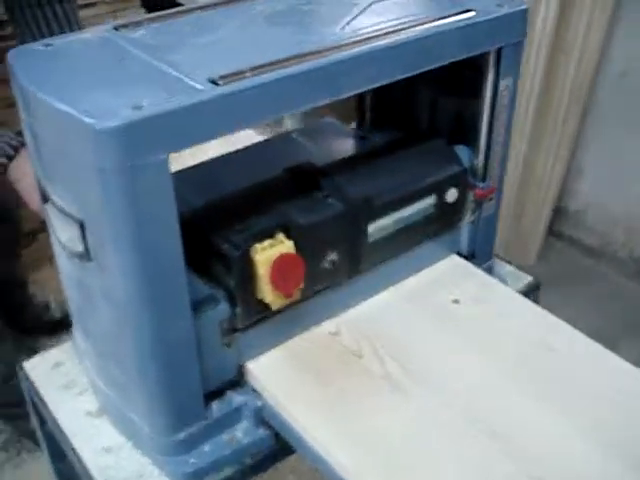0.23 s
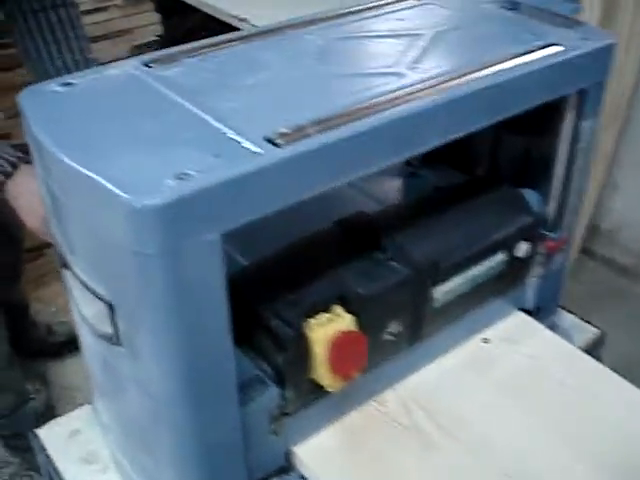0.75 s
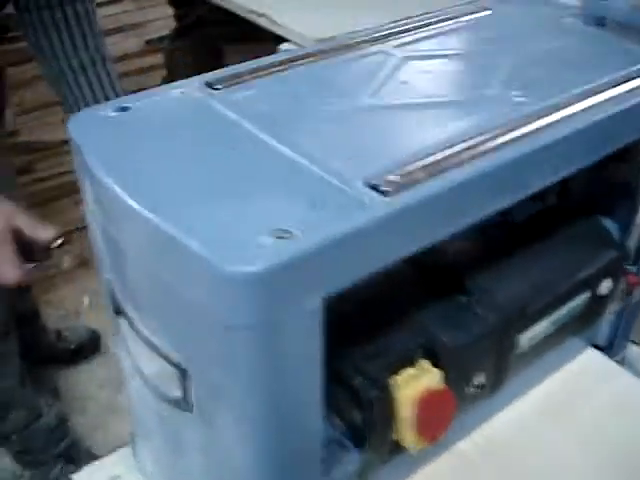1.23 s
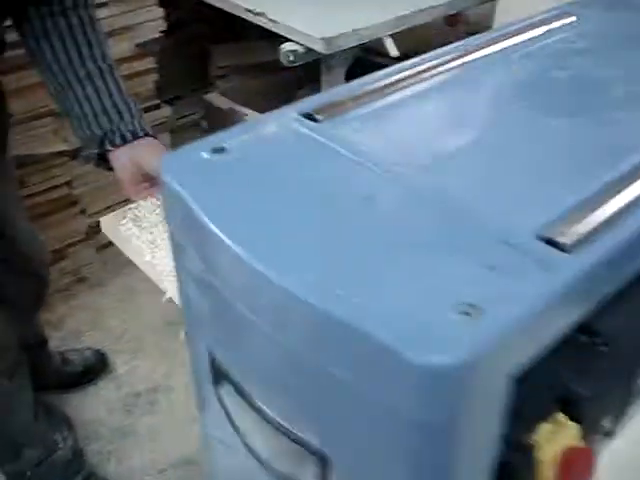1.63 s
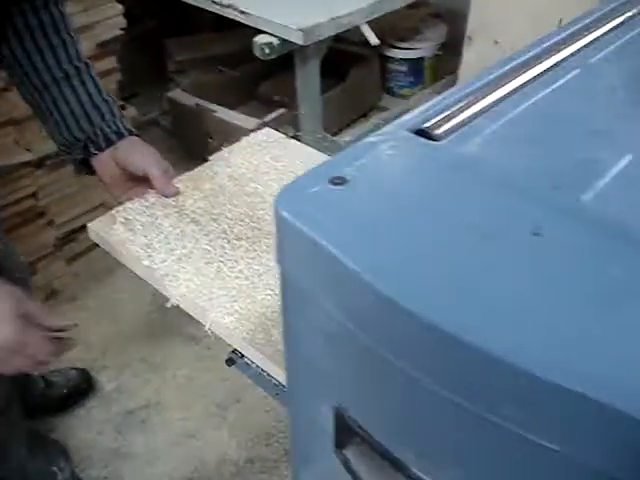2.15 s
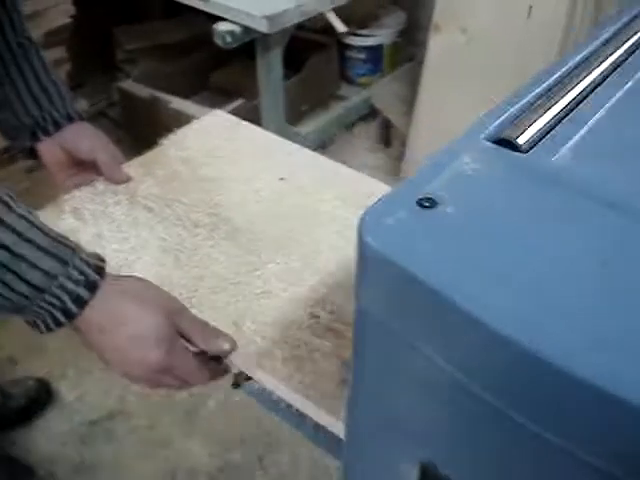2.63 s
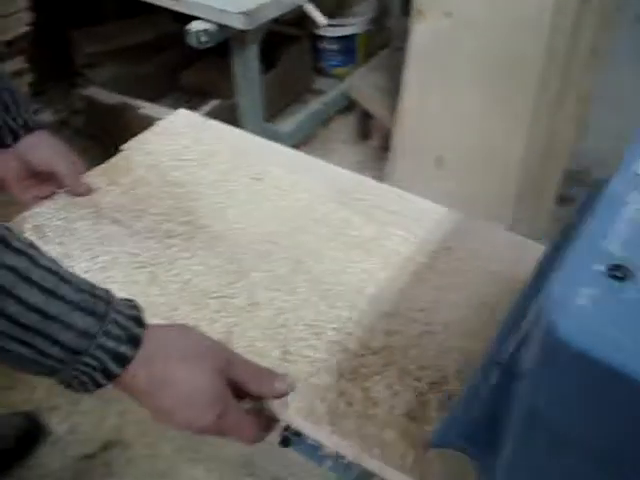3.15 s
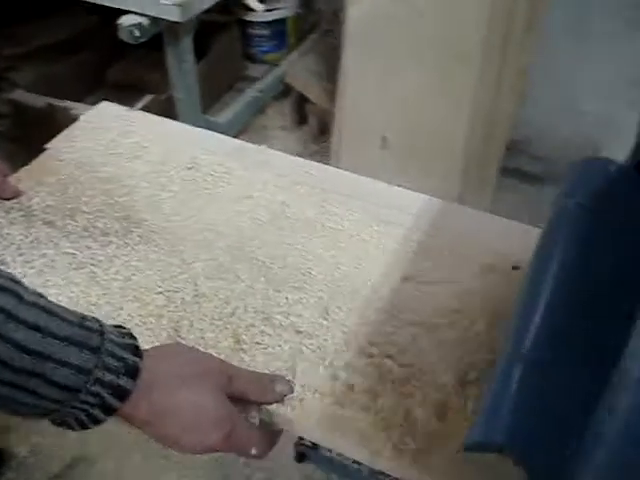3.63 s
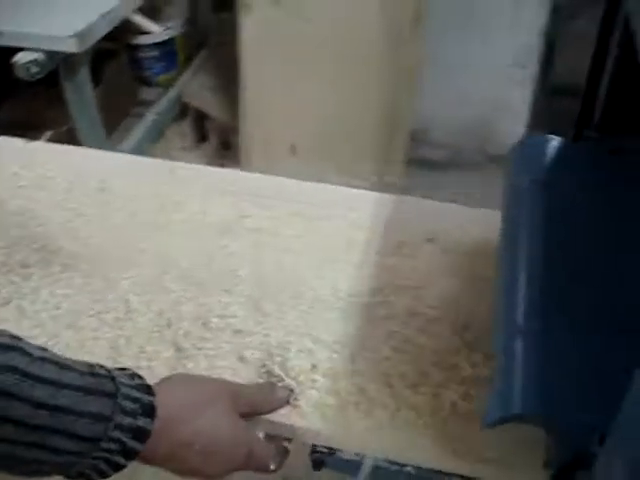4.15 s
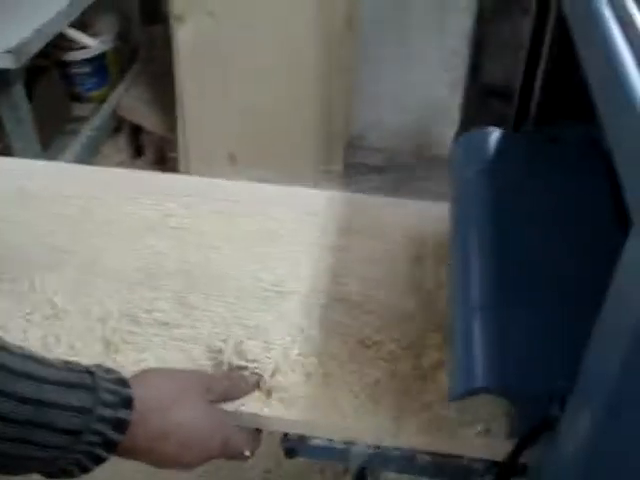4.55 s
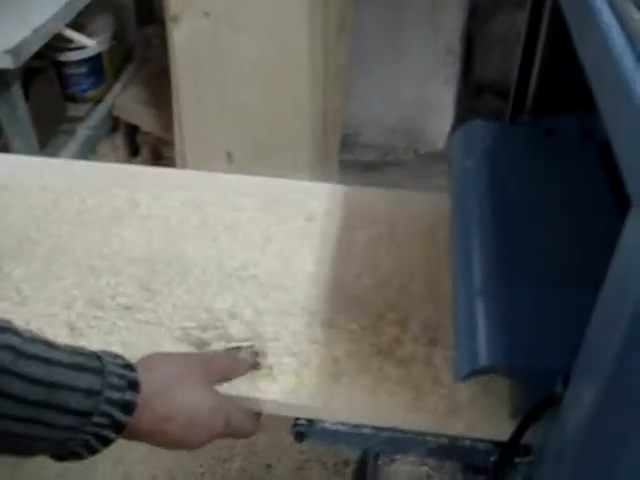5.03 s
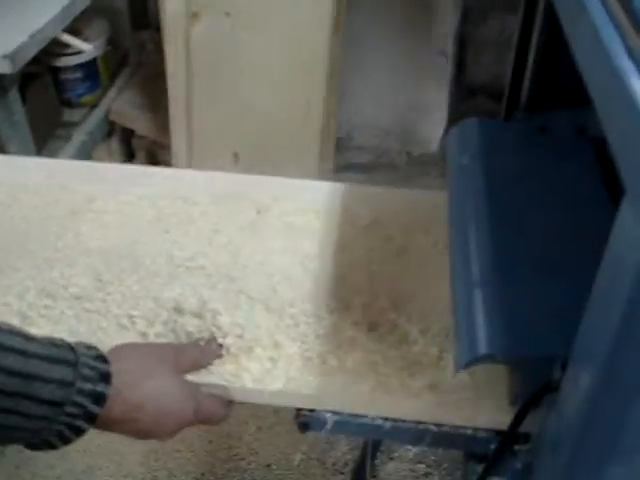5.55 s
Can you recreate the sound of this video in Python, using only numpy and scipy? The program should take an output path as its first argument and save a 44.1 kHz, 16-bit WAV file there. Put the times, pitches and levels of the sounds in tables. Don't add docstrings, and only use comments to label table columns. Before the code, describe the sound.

In a workshop, a powered planer drones without pause, a dense electric buzz wrapped in coarse hiss and tiny chip ticks. The pitch climbs over the first half, slides down under load, and lifts again in the last second. A moving cheap camera microphone gives hollow, swirling echo changes, mild overload, thin bass, gritty treble and a few dull knocks.

```python
import sys
import numpy as np
from scipy import signal
from scipy.io import wavfile
from scipy.ndimage import uniform_filter1d, minimum_filter1d

SR = 44100
rng = np.random.default_rng(int(sys.argv[2]) if len(sys.argv) > 2 else 0)


def volts_from_db(level):
    exponent = np.asarray(level, float) / 20
    return 10 ** exponent


def transcribe(signal):
    frames = np.atleast_2d(signal).T
    limited = np.clip(frames, -1, 1)
    pcm = np.round(limited * 32767).astype(np.int16)
    wavfile.write(sys.argv[1], SR, pcm)


N = 255780
HOP = 256


def knife(turn, count=76):
    # (order, level [dB])
    behind = [(1, -39.5), (2, -23.5), (3, -19.5), (4, -15), (5, -1), (6, 0.5), (7, -2), (8, -1), (9, -4.5),
              (10, -8.5), (11, -6), (12, -1.5), (13, -8), (14, -2), (15, -11), (16, -4.5), (17, -16.5),
              (18, -0.5), (19, -1), (20, -4.5), (21, 3), (22, -4), (23, -2.5), (24, 0.5), (25, -4.5),
              (26, -2.5), (27, -12.5), (28, -5), (29, -3), (30, -14)]
    beside = [(1, -29), (2, -26.5), (3, -5), (4, -10), (5, -7.5), (6, -1), (7, -3.5), (8, 5), (9, -1),
              (10, 1), (11, 0.5), (12, 0.5), (13, 1), (14, -0.5), (15, -4), (16, -7), (17, 1), (18, -3),
              (19, 0), (20, -6), (21, -3), (22, -4.5), (23, -11), (24, -1), (25, -12), (26, -2), (27, -6),
              (28, -6), (29, -5), (30, -9.5)]
    front = [(1, -37.5), (2, -30.5), (3, -26.5), (4, -12), (5, -18), (6, -7), (7, 2), (8, -7), (9, -6),
             (10, -5.5), (11, -7), (12, -4.5), (13, -2.5), (14, -8.5), (15, -7), (16, -8.5), (17, -11),
             (18, -5), (19, -5), (20, -7.5), (21, -1), (22, -4.5), (23, -9.5), (24, -7), (25, -3.5),
             (26, -6), (27, -18), (28, -2), (29, -4.5), (30, -15.5)]
    place_times = [0.78, 2.35, 4.37]
    # (frequency [Hz], level [dB])
    tone_share = [(300, -2.7), (1500, -5), (3100, -5), (5000, -4), (7000, -2.5), (9000, -0.5)]
    first_high_db, fall_db = -8, 0.62
    lasting_scatter, drifting_slip = 0.75, 1.5
    most_echo, quick_share = 0.4, 0.09

    t = np.arange(N // HOP + 2) * HOP / SR
    order = np.arange(1, count + 1)
    low = np.array([behind, beside, front])[:, :, 1].T
    low_db = np.array([np.interp(t, place_times, row) for row in low])
    high_db = first_high_db - fall_db * np.arange(count - len(low))
    db = np.vstack([low_db, high_db[:, None] + 0 * t])
    hz = order[:, None] * speed(t)
    db = db + interference_db(t, hz) + view_db(t, hz)
    total_db = 10 * np.log10(volts_from_db(2 * db).sum(0))
    db = db + walk(t, column=1) - total_db + read(tone_share, hz)

    slow = drift(db.shape, 1, 14.9) + 1j * drift(db.shape, 1, 16)
    quick = drift(db.shape, 3, 3) + 1j * drift(db.shape, 3, 3)
    echo_share = np.clip(0.32 + 0.024 * order, 0, most_echo)[:, None]
    path = np.sqrt(1 - echo_share ** 2) + echo_share * slow / np.sqrt(2) + quick_share * quick
    delay = np.cumsum(lasting_scatter * drift((count, 1), 2, 1), 0)
    delay = delay + drifting_slip * drift(db.shape, 5, 70)
    gain = -np.sqrt(2) * volts_from_db(db) * path * np.exp(1j * delay * walk(t, column=3))

    one_turn = np.exp(2j * np.pi * turn)
    wave, out, at = 1, np.zeros(N), np.arange(N) / SR
    for row in gain:
        wave = wave * one_turn
        out += np.interp(at, t, row.real) * wave.real - np.interp(at, t, row.imag) * wave.imag
    return out


def turns():
    tremor = evened(uniform_filter1d(rng.standard_normal(N), size=400))
    return np.cumsum(speed(np.arange(N) / SR)) / SR + 0.00068 * tremor


def speed(t):
    # (time [s], turning rate [Hz])
    turning_rate = [(0,126.1),(.2,126.1),(.45,124.9),(.7,123.2),(1.1,126.9),(1.42,130.1),(1.7,129.7),(2,130.5),(2.4,133.9),(2.6,134.7),(2.95,132.9),(3.2,128.9),(3.5,121.6),(4.4,115.8),(4.92,111),(5.2,113.9),(5.42,115.6),(5.8,125.1)]
    return np.interp(t, *np.transpose(turning_rate))


def bite(turn, treble, spread_db):
    depth_db = spread_db * rng.standard_normal(1000)[turn.astype(int)]
    change = volts_from_db(uniform_filter1d(depth_db, size=40)) - 1
    return treble_of(treble * change, hz=1370)


def fibres(turn):
    # (frequency [Hz], level [dB per Hz])
    hiss_spectrum = [(18, -56), (30, -14), (181, -35.5), (230, -17), (287, -16), (477, -6.5), (703, -5.5),
                     (775, 0), (1200, -2.5), (2200, 0), (5400, -6), (9900, -16), (12900, -63),
                     (21800, -120)]
    frames = N // HOP + 5
    hz = np.fft.rfftfreq(1024, 1 / SR)
    t = np.arange(frames) * HOP / SR
    a, b = rng.standard_normal((2, 513, frames))
    walk_db = walk(t, column=1) + view_db(t, hz[:, None])
    patches_db = 2.2 * drift(a.shape, 12, 5)
    z = (a + 1j * b) * volts_from_db(read(hiss_spectrum, hz)[:, None] + 0.32 * walk_db + patches_db)
    hiss = evened(signal.istft(z, nperseg=1024, noverlap=768)[1][:N])

    bright = treble_of(hiss, hz=2720)
    puff = np.exp(-(turn % 1) / 0.29) + 0.5 * np.exp(-((turn + 0.5) % 1) / 0.082)
    uneven = volts_from_db(1.0 * rng.standard_normal(2000))[(2 * turn).astype(int)]
    puffed = treble_of(bright * (puff * uneven - 0.4), hz=1180)
    return volts_from_db(-29.3) * evened(hiss + 2.66 * puffed)


def chips():
    chips_per_s, level_db = 700, -38
    strikes = rng.random(N) < chips_per_s / SR
    size = volts_from_db(2.2 * np.minimum(rng.exponential(1, N), 4)) * strikes
    kind = rng.integers(0, 12, N)
    t, out = np.arange(100) / SR, np.zeros(N)
    for k, hz in enumerate(np.geomspace(2500, 9000, 12)):
        tick = np.sin(2 * np.pi * hz * t) * np.exp(-t * hz / 6.3)
        out += signal.oaconvolve(size * (kind == k), tick)[:N]
    return volts_from_db(level_db) * evened(out)


def bumps():
    # (time [s], level [dB])
    knocks = [
        (1.857, -39),
        (2.974, -41),
        (4.152, -45),
        (4.845, -38),
    ]
    t, out = np.arange(N) / SR, np.zeros(N)
    for s, db in knocks:
        u = (t - s) / 0.0013
        out += volts_from_db(db) * np.exp(-np.minimum(u ** 2, 50))
    return out


def interference_db(t, hz):
    # (time [s], half
    # length [s], frequency [Hz], half width [Hz], level [dB])
    passing_echoes = [(0.466, 0.13, 970, 153, 9.5), (1.14, 0.62, 2160, 70.5, 15), (1.615, 0.72, 1150, 69.6, 8),
                      (1.62, 0.36, 1560, 305, 4), (1.697, 0.75, 520, 70, 9), (1.923, 0.21, 2930, 150, 11),
                      (2.396, 0.15, 4240, 300, 8), (2.712, 0.46, 2191, 150, 10), (2.76, 0.1, 810, 300, 4.5),
                      (3.0, 0.24, 5101, 300, 9), (3.13, 0.067, 990, 150, 9), (3.299, 0.22, 507, 150, 5),
                      (3.42, 0.43, 3000, 303, 6.5), (3.475, 0.094, 1240, 69, 9), (3.778, 0.58, 1850, 150, 5.5),
                      (3.84, 0.4, 735, 148, 6), (4.56, 0.45, 3978, 298, 1), (4.92, 0.23, 235.2, 150, 6.5),
                      (4.978, 0.22, 2731, 70, 12.5), (5.22, 0.46, 2260, 149, 9), (5.225, 0.19, 4850, 302, 7),
                      (5.287, 0.29, 994, 69.4, 13.5),
                      (.065,0.16,490,150,-20),(.25,0.17,1380,70,-8),(.663,0.29,1100,70,-10),(1.05,0.17,2330,90,-11),(1.258,0.28,1020,150,-9),(1.45,.15,1320,70.05,-15),(1.798,0.21,750,70,-10),(1.864,.12,663,70,-18),(2.2,.15,3050,150,-8),(2.456,0.17,1150,150,-14),(2.458,.23,533,70,-12),(2.55,0.21,2288,70,-8),(2.874,0.13,1630,150,-19),(3.3,.1,1510,120,-9),(3.7,0.28,360,60.3,-16),(3.75,.12,2520,80,-7),(3.955,0.16,1153,70,-16),(3.956,0.13,2450,150,-24),(4.077,0.26,594,70,-8),(4.82,0.072,680,70,-13),(4.913,0.049,2000,150,-19),(5,0.09,3100,150,-8),(5.224,0.19,790,70,-10.5),(5.65,0.21,2480,120,-12),
                      (.1,0.17,3270,150,1),(0.507,.2,604,70,2.5),(0.748,0.15,3120,150,6),(1.02,0.13,2560,70.4,7),(1.198,0.16,3250,250,5.5),(1.35,0.47,3700,150,4.5),(1.666,0.063,3110,70,12),(1.83,0.097,1460,199.6,4.5),(1.9,.15,3500,80,7),(2.7,0.29,1351,70,3.5),(3,0.17,3900,302,8),(2.4,0.18,3340,80,7),(3.05,0.17,400,70.03,6.5),(3.45,0.12,980,90,4),(3.65,0.18,3250,70,7),(3.98,0.059,1550,250,6),(4.683,0.19,2070,199,2),(4.678,.22,1129,69.6,2),(4.85,.08,3800,69.6,15.5),(5.414,0.064,1100,150,3),(5.45,0.071,1390,100,5),(5.5,.15,3470,80,1),(5.642,.4,3877,150.7,4),(5.7,0.17,1844,249,5.5)]
    return sum(db * np.exp(-((hz - f) / w) ** 2 - ((t - s) / half) ** 2)
               for s, half, f, w, db in passing_echoes)


def view_db(t, hz):
    return read([(3100, 0), (6500, 1)], hz) * walk(t, column=2)


def walk(t, column):
    # (time [s], level [dB], treble lift by the view [dB], spread of the strike over the turn [about 0-1])
    camera_path = [(0,-19,-3,1.05),(.45,-17.5,-1.5,0.73),(.78,-19,4.5,1.16),(1.05,-19.5,2.5,1.2),(1.4,-19.5,5,1.05),(1.82,-15.5,-1,0.74),(1.99,-20,2.5,0.92),(2.41,-20.5,5.5,1.06),(2.75,-19,0.5,1.12),(3.1,-19,2,0.8),(3.45,-17,-6,0.87),(3.65,-19,-2,0.56),(3.98,-16,-2,0.68),(4.3,-17,0,.9),(4.8,-17.5,3.5,1.12),(5.02,-17.5,-1.5,1.18),(5.45,-16,1,1.09),(5.62,-20,-5.5,0.97)]
    points = np.transpose(camera_path)
    return np.interp(t, points[0], points[column])


def drift(shape, wide, long):
    field = uniform_filter1d(rng.standard_normal(shape), max(round(wide), 1), 0)
    long = max(round(long), 1)
    return evened(uniform_filter1d(uniform_filter1d(field, long, 1), long, 1))


def evened(x):
    return x / np.sqrt(np.mean(abs(x) ** 2) + 1e-20)


def read(points, hz):
    f, value = np.transpose(points)
    return np.interp(np.log(hz + 1), np.log(f + 1), value)


def treble_of(x, hz):
    return signal.sosfilt(signal.butter(2, hz, "high", fs=SR, output="sos"), x)


def scene():
    turn = turns() + 1
    cut = knife(turn) + fibres(turn)
    cut = cut + bite(turn, treble_of(cut, hz=3060), spread_db=1.5)
    return (cut + chips() + bumps())[None]


def ducked(x):
    # (time [s], level [dB])
    flinches = [
        (1.125, -3.5),
        (1.97, -3),
        (2.111, -3.5),
        (2.975, -6.5),
        (3.901, -4),
    ]
    release_s = 0.015
    t = np.arange(N) / SR
    return x * volts_from_db(sum(db * (t > s) * np.exp(-abs(t - s) / release_s) for s, db in flinches))


def starved(x):
    # (frequency [Hz], level under the running mean [dB])
    gap_limit = [(3000, -90), (4300, -20), (5200, -5), (8000, -4.5), (10000, -5)]
    gap_db, luck_db, edge_hz = -28, 1.2, 10150
    hz, t, z = signal.stft(x, SR, nperseg=256)
    band = (np.log(hz + 1) * 9).astype(int)
    member = (band == np.unique(band)[:, None]).astype(float)
    power = member.T @ (member @ abs(z) ** 2) + 1e-20
    under_db = 10 * np.log10(power / uniform_filter1d(power, size=14, axis=1))
    luck = np.repeat(rng.exponential(1, (100, len(t) // 2 + 1)), 2, 1)[band, :len(t)]
    limit_db = read(gap_limit, hz)[:, None] + luck_db * (luck - 1)
    gate = np.where(under_db < limit_db, volts_from_db(gap_db), 1)
    gate = minimum_filter1d(gate, size=2, axis=1)
    kept = signal.istft(z * gate, SR, nperseg=256)[1][:, :N]
    low_pass = signal.firwin(401, edge_hz, window=("kaiser", 9), fs=SR)
    return signal.oaconvolve(kept, low_pass[None], "same")


def top_cut(x):
    return signal.sosfilt(signal.butter(12, 10480, fs=SR, output="sos"), x)


def record(dry):
    overloaded = 1.792 * np.tanh(ducked(dry) / 1.225)
    mix = starved(treble_of(overloaded, hz=19))
    return top_cut(mix)


dry = scene()
out = record(dry)
transcribe(out)
```